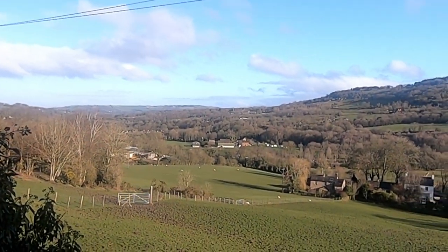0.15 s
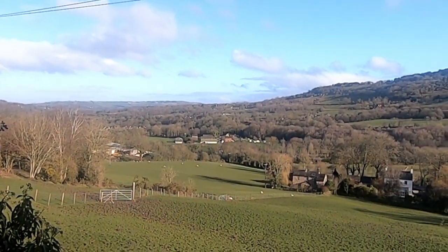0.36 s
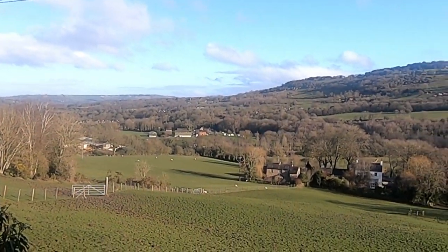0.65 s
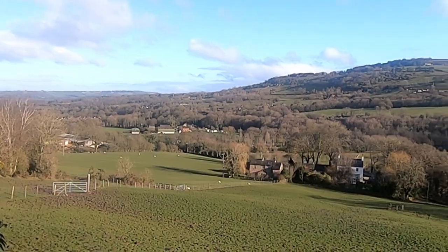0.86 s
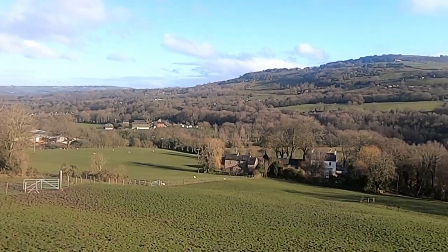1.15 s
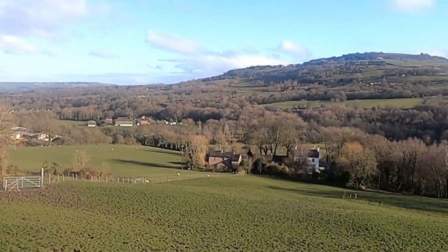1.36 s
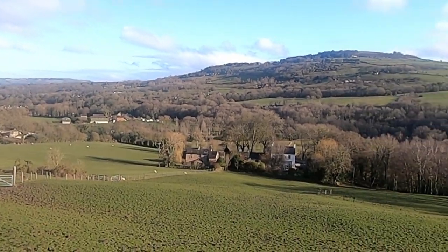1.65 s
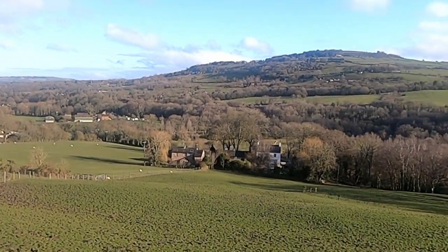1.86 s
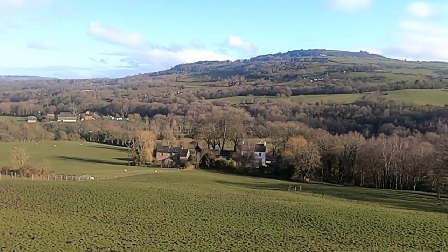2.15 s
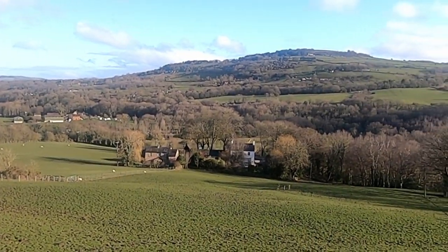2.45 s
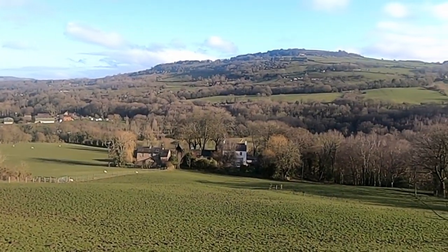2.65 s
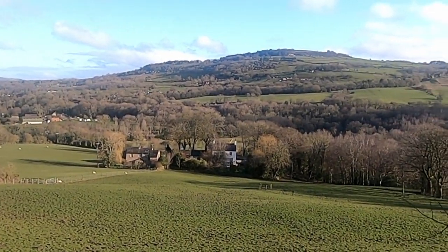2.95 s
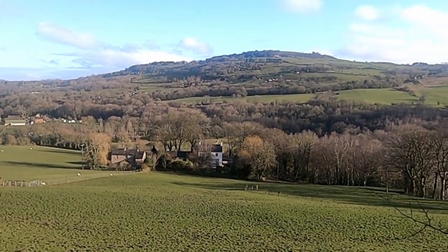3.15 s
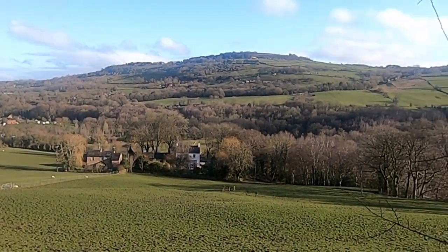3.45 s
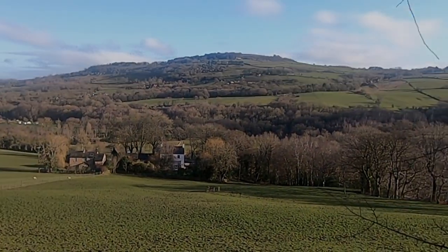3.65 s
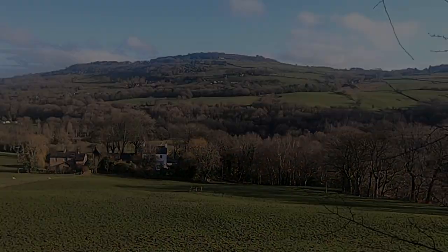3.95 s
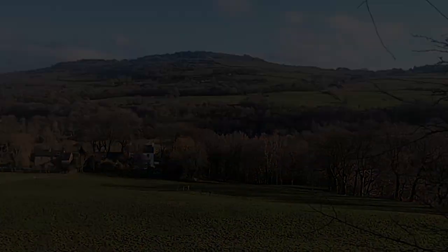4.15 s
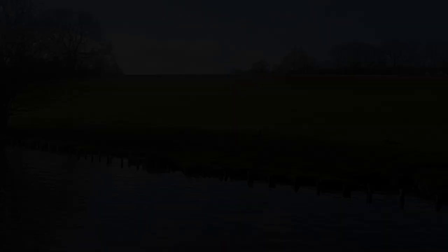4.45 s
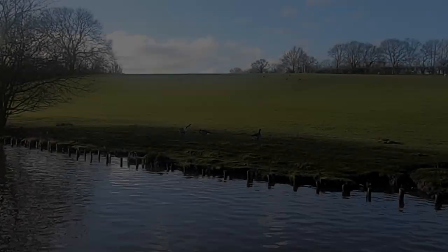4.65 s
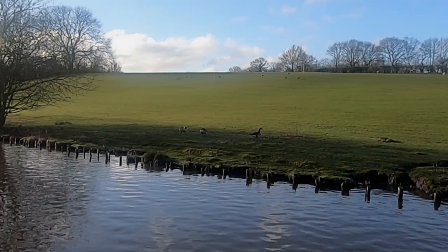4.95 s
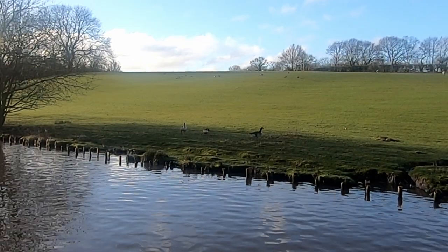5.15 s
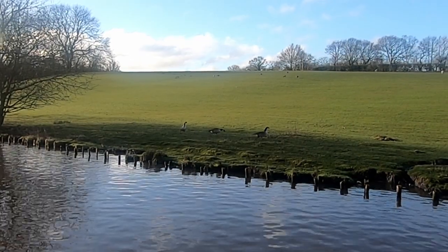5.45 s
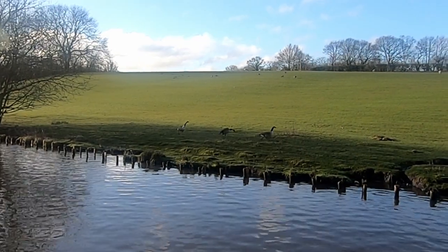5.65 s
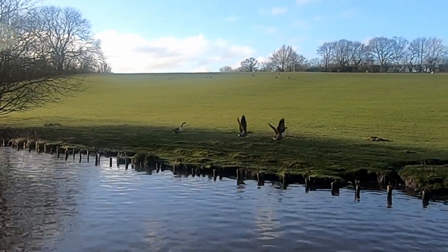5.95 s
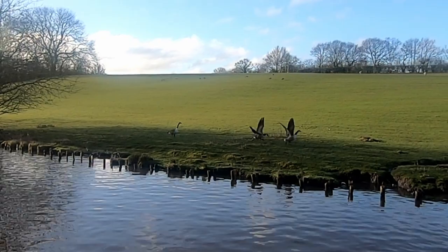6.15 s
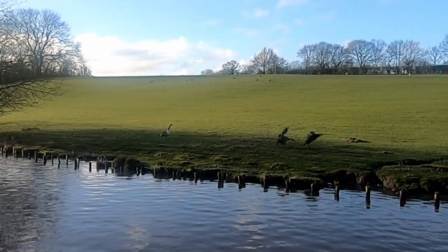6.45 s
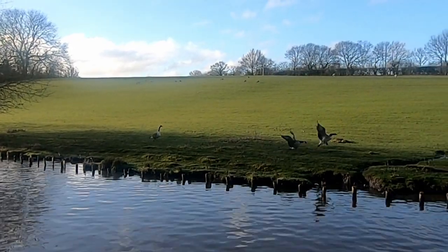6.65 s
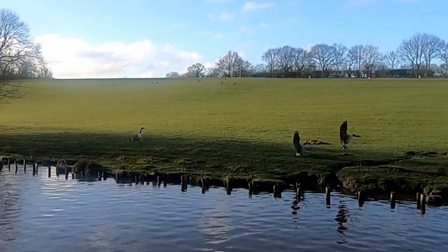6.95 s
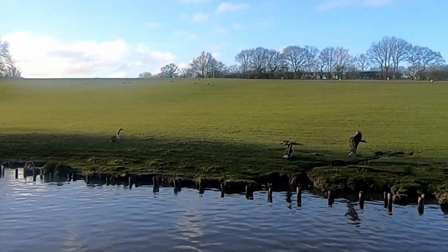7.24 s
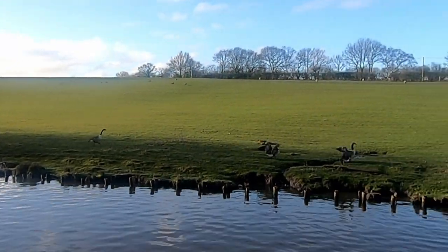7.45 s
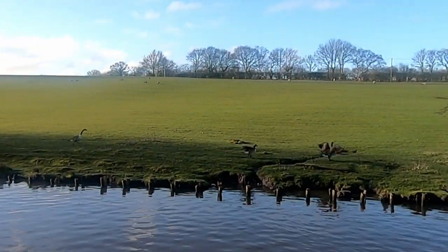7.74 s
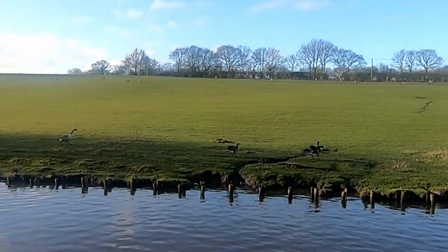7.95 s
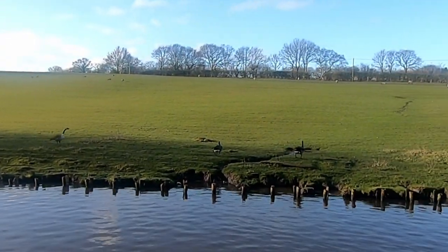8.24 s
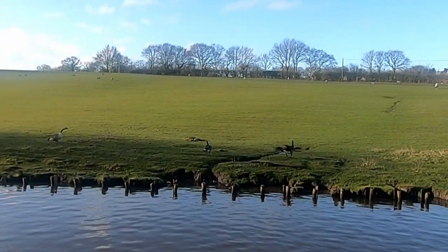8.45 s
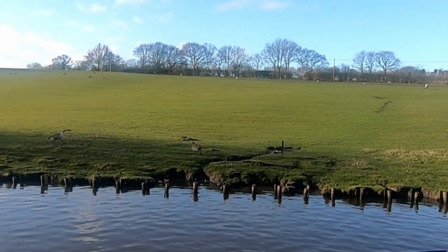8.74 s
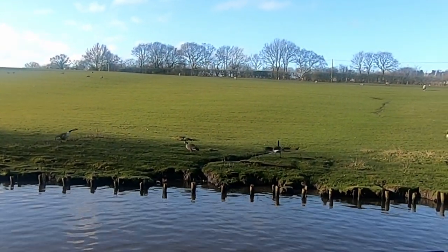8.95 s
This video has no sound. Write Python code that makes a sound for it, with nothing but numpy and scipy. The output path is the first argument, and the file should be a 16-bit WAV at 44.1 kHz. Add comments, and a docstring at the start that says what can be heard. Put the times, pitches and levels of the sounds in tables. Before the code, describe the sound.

Low wind, soft knocks and scattered distant honks fade away; a steady diesel throb and water wash follow, with geese calling loudly near the end.

```python
"""Geese honk over an open field in wind and rustle, with a distant drone, small birds and a few small knocks.
The field fades to nothing and a canal fades in, aboard a boat whose diesel chugs as water washes the hull.
More geese call: drawn notes and honks, a long call winding up, then a rattle, a yodel and a last honk.
Goose voices are buzzing membranes through throat and beak resonances; the engine is a stack of exhaust
tones with throbbing clatter; air and water are coloured noise; knocks are damped rings with cracks."""
import sys
import numpy as np
from scipy import signal
from scipy.fft import rfft, irfft, next_fast_len
from scipy.io import wavfile
from scipy.ndimage import map_coordinates

SR = 44100
rng = np.random.default_rng(int(sys.argv[2]) if len(sys.argv) > 2 else 0)


def int16_out(signal):
    """Quantize to a 16-bit WAV file."""
    q = np.round(np.clip(np.atleast_2d(signal).T, -1, 1) * 32767)
    wavfile.write(sys.argv[1], SR, q.astype(np.int16))


N = 400869
TIME = np.arange(N) / SR

# Honks: goose, start_s, length_s, pitch_hz, sag (share of pitch), hoarse_s, throat_hz,
# level_db and treble_db (both before trims), catch_s (rough catch ahead of the start)
HONK_NOTES = [("far", 1.12, .095, 664, .045, .015, 1270, -35.5, -18, .08),
              ("near", 2.295, .065, 618, 0.019, .03, 1100, -47.5, -23, 0.044),
              ("near", 2.44, 0.046, 738, .05, .015, 1450, -48.5, -11, 0.014),
              ("near", 2.645, 0.155, 628, -0.031, 0.016, 1450, -44, -5.5, 0.016),
              ("near", 2.897, .042, 785, 0.056, .02, 1520, -41, -7.5, .02),
              ("near", 3.075, 0.057, 650, .02, .02, 1330, -44, -6.5, .025),
              ("near", 3.122, .036, 780, .04, 0.018, 1520, -42.5, -3, 0.014),
              ("near", 3.39, 0.031, 778, .04, .015, 1300, -42.5, -5, .03),
              ("near", 3.632, 0.047, 616, 0.0091, 0.019, 1100, -43, -6.5, .04),
              ("near", 3.858, .042, 616, 0, 0.021, 1230, -43, -7, .018),
              ("near", 4.005, 0.094, 645, .01, 0.0085, 1290, -41, -8, .012),
              ("near", 4.128, 0.044, 606, 0, .02, 1240, -43.5, -5, 0.017),
              ("near", 4.355, 0.047, 560, 0.024, 0.035, 1260, -47.5, -5, .015),
              ("takeoff", 6.962, .11, 667, 0.018, .012, 1345, -21, -10, .012),
              ("landing", 9.01, .058, 664, 0.015, 0.027, 1390, -30, -7.5, 0.041)]
# Drawn notes: goose, start_s, length_s, mid_pitch_hz, rise (share of pitch), throat_hz,
# level_db and treble_db (both before trims), rasp (0-1)
DRAWN_NOTES = [("far", .69, .14, 600, -.03, 1200, -49.5, -38, .12),
               ("far", .79, .33, 473, .16, 800, -44, -36.5, .064),
               ("far", 4.87, .13, 424, .12, 880, -52.5, -24, .25),
               ("far", 4.985, .14, 446, -.02, 900, -44.5, -24, .2),
               ("near", 2.305, 0.059, 532, -.03, 1060, -45.5, -20, .15),
               ("near", 2.628, 0.033, 535, -.08, 1070, -46.5, -22, .3),
               ("near", 2.665, 0.063, 718, -.05, 1440, -49, -15, .15),
               ("near", 3.025, .065, 463, .2, 850, -48.5, -23, 0.33),
               ("near", 3.51, .095, 478, .2, 1000, -46, -13.5, 0.55),
               ("near", 4.1, 0.024, 620, .03, 1240, -41, -10.5, .5),
               ("takeoff", 6.545, .035, 628, .11, 1100, -32, -18.5, 0.45),
               ("landing", 8.254, .028, 622, .13, 1250, -36.5, -27, .2),
               ("landing", 8.283, 0.033, 438, -.02, 1080, -41.5, -15, .4),
               ("landing", 8.31, 0.029, 412, -.07, 1230, -36.5, -25, .2),
               ("landing", 8.41, 0.055, 480, 0.055, 1430, -46.5, -29, .45),
               ("landing", 8.66, .07, 490, -0.054, 1450, -35.5, -34, 0.62),
               ("landing", 8.735, 0.035, 463, -0.055, 1380, -34.5, -20, .12)]
# Long calls that change voice: time_s, pitch_hz, level_db, treble_db (before trim), rasp (0-1), split (0-1)
WIND_UP_CURVE = [(6.578, 450, -34.5, -20, 0.25, 0), (6.618, 448, -33, -16, 0.2, 0),
                 (6.64, 465.7, -32, -9, 0.1, 0.2), (6.72, 479, -29.5, -10, .06, 0.22),
                 (6.8, 486.7, -28.5, -11, .06, 0.08), (6.825, 488, -30, -12, .08, 0.4),
                 (6.875, 496, -28.5, -12, .08, 0.3), (6.9, 501, -27.5, -13, .06, 0.07),
                 (6.94, 507, -29, -11, .06, 0), (6.965, 523, -28.5, -8, 0.36, 0.03)]
RATTLE_CURVE = [(8.455, 597, -37, -13, 0.067, 0), (8.495, 607, -34, -14, .05, 0.26),
                (8.525, 613, -35, -12, 0.067, 0.87), (8.62, 623, -32.5, -8.5, 0.065, 0.94),
                (8.65, 631, -33.5, -11.5, .05, 0.0013), (8.7, 631, -33, -10.5, .05, 0),
                (8.76, 614, -40, -10, .1, 0.056)]
YODEL_CURVE = [(8.74, 583, -32, -8, .3, .7), (8.765, 556, -32.5, -10, .15, 0.5),
               (8.798, 520, -33.5, -18, 0.066, 0), (8.825, 547, -32, -13.5, .06, 0),
               (8.86, 569, -30, -10.5, 0.055, 0), (8.88, 557, -33, -12, .2, 0.37),
               (8.895, 528, -38, -14, .25, 0.1)]
# Upper resonances of windpipe and beak: frequency_hz, relative gain_db
FAR_RESONANCES = [(2000, -15.5), (2600, -3.5), (3300, 2.5), (4000, -0.5), (4600, -7), (5400, -22.5),
                  (6500, -29), (7200, -20), (9500, -39.5)]
NEAR_RESONANCES = [(2000, -15.5), (2550, -4.5), (3200, -9), (3850, -2.5), (4500, -0.5), (5200, -2),
                   (7000, 0), (7800, -8), (8500, -13.5), (11000, -49)]
TAKEOFF_RESONANCES = [(2350, -30), (2650, -14.5), (3300, 5), (3950, 0), (4600, -1.5), (5300, -9.5),
                      (5900, -23), (6600, -19.5), (7300, -29.5), (8500, -36), (9300, -42.5), (12000, -49)]
LANDING_RESONANCES = [(2300, -27.5), (2850, -5), (3400, 1.5), (4000, -5), (4600, -1), (5200, -11),
                      (6000, -9), (6700, -13), (7400, -17), (8200, -32), (9500, -27.5), (11000, -52)]
WIND_UP_RESONANCES = [(2350, -41), (2900, -9), (3400, 2), (3850, 2), (4350, -16.5), (4800, -8.5),
                      (5300, -10.5), (5800, -26.5), (6700, -28.5), (8000, -42), (9300, -46)]
RATTLE_RESONANCES = [(2300, -18), (2850, -0.5), (3400, 2), (4000, -2.5), (4500, -1.5), (5100, -5.5),
                     (5700, -3), (6300, -4), (6900, -11.5), (7600, -19), (8300, -32), (8900, -27),
                     (11000, -48)]
YODEL_RESONANCES = [(2300, -36), (2850, -5), (3400, 0), (4000, -5), (4600, -4), (5100, -16), (5700, -21),
                    (6200, -17), (6800, -10.5), (7400, -18), (8200, -34), (9500, -29), (11000, -50)]
# Echoes from banks and trees: delay_s, level_db (before trim)
ECHO_TAPS = [(.021, -25), (0.046, -22.5), (.083, -29.5)]
# Boat engine: time_s, exhaust level_db (before trim)
ENGINE_CURVE = [(4.56, -51), (4.63, -34.5), (4.77, -38), (5.15, -30), (5.23, -22), (6.21, -18), (9.05, -21),
                (9.09, -22)]
# Exhaust tones: multiple of the firing rate, relative level_db
EXHAUST_TONES = [(1, -6), (2, 1.5), (3, 2), (4, -15.5), (5, -14), (6, -26), (7, -26.5), (8, -29.5),
                 (9, -29.5), (10, -38), (11, -41), (12, -31)]
# Around the boat: time_s, clatter_db, wash_db (before trim)
BOAT_CURVE = [(4.6, -47.5, -53.5), (5.15, -42, -51.5), (5.3, -33.5, -49), (6.0, -34, -46),
              (7.3, -34.5, -46.5), (8.1, -40, -51.5), (8.5, -39, -48.5), (9.09, -39.5, -43.5)]
# Breeze aboard: time_s, level_db
BREEZE_CURVE = [(7.4, -54), (8.42, -49), (8.48, -40), (9.09, -45)]
# Small knocks and bumps: start_s, level_db, ring_hz, crack_db (relative to the ring), top_hz of the knock
KNOCK_HITS = [(1.128, -28, 310, -1, 3970), (1.293, -24.5, 204, -16, 3000), (1.454, -33.5, 1310, -6, 3200),
              (1.499, -35, 910, -6, 2800), (1.541, -35.5, 700, -3.5, 2500), (1.710, -25.5, 507, -29, 3000),
              (1.793, -30, 1150, -7.5, 4000), (1.837, -32.5, 990, -8, 3500), (2.089, -35.5, 700, -10, 2500),
              (2.862, -26.5, 201, -26, 2500), (3.242, -38, 1210, -9, 3000), (3.437, -33, 1010, -16, 3000),
              (6.559, -32, 1307, 4, 13000)]
# Small birds far off: start_s, length_s, from_hz, to_hz, level_db
CHIRP_NOTES = [(0.73, 0.041, 3400, 4600, -76), (0.872, 0.065, 3900, 4560, -77),
               (3.165, .055, 3200, 3550, -67), (3.23, 0.11, 3950, 3900, -73),
               (4.274, 0.049, 3800, 3300, -75), (4.847, 0.085, 3000, 3870, -69)]
# Over the field: time_s, rustle_db, drone_db
FIELD_CURVE = [(0, -47, -39.5), (1.3, -44.5, -39), (2.05, -45.5, -38), (2.2, -46.5, -32.5), (2.9, -49, -36),
               (3.45, -50, -39)]
# Noise colours: frequency_hz, relative gain_db
WIND_COLOUR = [(18, 6), (45, 7), (75, 6.5), (120, -2), (180, -5), (250, -18.5), (400, -37.5)]
RUSTLE_COLOUR = [(220, 3.5), (480, -3), (700, -6.5), (1100, -7), (1800, -16), (2600, -20.5), (3800, -25.5),
                 (4700, -34.5), (5600, -54), (8000, -47), (10400, -73)]
HISS_COLOUR = [(3500, -5), (4500, 0), (6000, -6), (8000, -4.5), (9500, -20.5)]
CLATTER_COLOUR = [(110, -1.5), (155, 1), (205, -13.5), (280, -14.5), (355, -17), (430, -23.5), (600, -29)]
WASH_COLOUR = [(330, -12), (500, -3), (700, -7), (1070, -4), (1600, -7.5), (2600, -11.5), (3500, -16.5),
               (4600, -26), (5500, -37), (8000, -36.5), (10400, -61)]
CRACK_COLOUR = [(400, -3.5), (1200, 1), (3000, -4), (4500, -13), (6000, -25), (10000, -33.5), (13000, -53)]

# goose voice
TOP_HARMONIC_HZ = 12500
HOLLOW_HZ = 2080  # the throat's response drops away above here
HOARSE_WIDENS = 1.6  # rasp blurs the throat resonance
SPLIT_SWING = 0.3  # radians by which a split voice pulls its cycles out of step
# the catch: pitch and rise as shares of the honk's pitch, rasp 0-1
CATCH_PITCH, CATCH_RISE, CATCH_RASP, CATCH_OVERLAP_S = 0.91, 0.08, 0.65, 0.016
CATCH_SWELL_DB, HONK_SWELL_DB = 3, -3  # from the middle of a note to its end
HONK_SCOOP, SCOOP_S = 0.015, 0.008  # scoop up to pitch, as a share of pitch
HONK_RASP, HONK_SPLIT = 0.55, 0.7  # extra rasp and split in the hoarse start
GLIDE_EVEN = 0.6  # steady share of a drawn glide; the rest comes at the ends
GLIDE_ARCH = 0.01  # droop of both ends, as a share of pitch
SWELL_DB_PER_RISE = 22.5  # loudness and pitch rise together
WIND_UP_THROAT_HZ, RATTLE_THROAT_HZ, YODEL_THROAT_HZ = 1114, 1176, 1536

# canal: fades in, and later spreads from the centre to both ears
FIRING_HZ, FIRING_WANDER_HZ = 28.96, 0.08
CANAL_S, ENGINE_IN_S, WASH_IN_S = 4.509, 0.099, 0.42
CANAL_WIDENS_S, CANAL_WIDE_S = 7.25, 7.58

CHIRP_ARCH_HZ = 200  # each chirp bows upward in its middle

# field: spreads from the centre, then fades out
WIND_DB = -36.5
GUST_S, GUST_LENGTH_S, GUST_DB = 4.13, 0.18, 4  # one late gust
WIDENS_S, WIDE_S, WIDE_DB = 1.82, 3.56, -8
HISS_DB, HISS_IN_S, HISS_FULL_S = -74, 1.6, 2.7
FADE_OUT_S, SILENT_S, FADE_POWER = 3.43, 4.483, 1.22


def from_db(db):
    """Decibels to gain."""
    return 10 ** (np.asarray(db) / 20)


def rms_one(x):
    """Scale to unit rms."""
    return x / np.sqrt(np.mean(x ** 2) + 1e-20)


def in_time(rows):
    """Draw each column of a curve table at every sample."""
    s, *columns = np.transpose(rows)
    return [np.interp(TIME, s, c) for c in columns]


def ramp(from_s, to_s):
    """0 at the first time, 1 at the second, straight between."""
    return np.clip((TIME - from_s) / (to_s - from_s), 0, 1)


def progress(length_s):
    """From 0 to 1 over a note."""
    return np.linspace(0, 1, int(length_s * SR))


def sine(pitch_hz):
    """A sine that follows a moving pitch."""
    return np.sin(2 * np.pi * np.cumsum(pitch_hz) / SR)


def low_pass(x, top_hz):
    """A gentle second-order treble cut."""
    return signal.sosfilt(signal.butter(2, min(top_hz, SR / 3), fs=SR, output="sos"), x)


def coloured(x, points):
    """Filter x by a drawn response, falling 36 dB per octave beyond its ends; unit rms."""
    size = next_fast_len(len(x))
    hz, db = np.transpose(points)
    f = np.maximum(np.fft.rfftfreq(size, 1 / SR), 1)
    octaves_outside = np.maximum(np.log2(hz[0] / f), 0) + np.maximum(np.log2(f / hz[-1]), 0)
    gain = from_db(np.interp(np.log(f), np.log(hz), db) - 36 * octaves_outside)
    return rms_one(irfft(rfft(x, size) * gain, size)[:len(x)])


def drift(rate, size=N):
    """Smooth random wander with about `rate` new values a second."""
    knots = rng.standard_normal(int(size / SR * rate) + 4)
    coarse = np.arange(0, size, 16)
    wander = map_coordinates(knots, [1 + coarse / SR * rate], order=2, mode="nearest")
    return np.interp(np.arange(size), coarse, wander)


def noise(points, flicker_db, rate):
    """Coloured noise with a restless level."""
    return coloured(rng.standard_normal(N), points) * from_db(flicker_db * drift(rate))


def add(track, start, sound):
    """Mix a sound into the track at a time."""
    at = int(start * SR)
    track[at:at + len(sound)] += sound[:N - at]


def place(x, pan_db, lag_ms):
    """Pan by level (positive is left) and by a delay of the left side."""
    left = np.interp(TIME - lag_ms / 1000, TIME, x) * from_db(pan_db / 2)
    return np.array([left, x * from_db(-pan_db / 2)])


def syrinx(pitch, rasp, split, tremor, uneven_db, order, jitter=0.054):
    """Buzzing membranes: rasp roughens cycles and adds puffs of noise; a split pulses every `order` cycles."""
    size = len(pitch)
    wobble = 1 + tremor * drift(70, size) + jitter * rasp * drift(400, size)
    phase = 2 * np.pi * np.cumsum(pitch * wobble) / SR
    swung = phase - SPLIT_SWING * split * np.sin(phase / order)
    buzz = np.zeros(size)
    for k in range(1, int(TOP_HARMONIC_HZ / pitch.max())):
        # each harmonic wavers in strength, the higher ones more
        waver = from_db(uneven_db * min(k / 10, 1) * drift(25, size))
        buzz += waver * np.cos(k * swung)
    puffs = 1.9 * rasp * rng.standard_normal(size) * (1 + np.cos(phase)) / 2
    gate = (1 + split * np.cos(phase / order)) / np.sqrt(1 + split ** 2 / 2)
    return (rms_one(buzz) + puffs) * gate


def geese(notes, beak, width_hz, fundamental_db, attack_s, release_s, treble_db, flutter_db, bloom, order,
          tremor=0.0015, uneven_db=3):
    """The buzz rings a throat resonance beside the fundamental, and the upper windpipe and beak resonances."""
    out = np.zeros(N)
    for start, throat_hz, *controls in notes:
        # hold the last values for half the release
        hold = (0, int(release_s / 2 * SR))
        held = (np.pad(c, hold, "edge") for c in np.broadcast_arrays(*controls))
        pitch, level_db, bright_db, rasp, split = held
        t = TIME[:len(pitch)]
        source = syrinx(pitch, np.clip(rasp, 0, 1), np.clip(split, 0, 1), tremor, uneven_db, order)
        hz = np.geomspace(380, 2900, 50)
        width = width_hz * (1 + HOARSE_WIDENS * np.mean(rasp ** 2))
        resonance = 1 / np.hypot(1, (hz ** 2 - throat_hz ** 2) / (2 * hz * width))
        fundamental = from_db(fundamental_db) / (1 + ((hz - pitch.mean()) / 60) ** 2)
        # a hollow lies between the throat and the beak resonances
        response = (resonance + fundamental) / (1 + (hz / HOLLOW_HZ) ** 20)
        throat = coloured(source, np.c_[hz, 20 * np.log10(response)])
        treble = coloured(source, beak) * from_db(bright_db + treble_db + flutter_db * drift(49, len(t)))
        attack = np.sin(np.pi / 2 * np.clip(t / attack_s, 0, 1))
        release = np.sin(np.pi / 2 * np.clip((t[-1] - t) / release_s, 0, 1)) ** 2
        # the upper harmonics need more push: they bloom in the middle of the note
        push = (np.sin(np.pi * t / t[-1]) ** 2 + 0.001) ** bloom
        add(out, start, from_db(level_db) * attack * release * (throat + push * treble))
    return out


def honks(goose, catch_db, catch_treble_db, drop, rasp):
    """A rough rising catch breaks upward into a note that starts hoarse, clears, sags or lifts, then drops."""
    notes = []
    for who, start, length, hz, sag, hoarse_s, throat_hz, level_db, bright_db, catch_s in HONK_NOTES:
        if who != goose:
            continue
        x = 2 * progress(catch_s + CATCH_OVERLAP_S) - 1
        rising = hz * (CATCH_PITCH + CATCH_RISE * x / 2)
        catch_level = level_db + catch_db + CATCH_SWELL_DB * x
        notes.append((start - catch_s, CATCH_PITCH * throat_hz, rising, catch_level,
                      bright_db + catch_treble_db, CATCH_RASP, 0))
        along = progress(length)
        scoop = HONK_SCOOP * np.exp(-along * length / SCOOP_S)
        pitch = hz * (1 - scoop - sag * along - drop * along ** 6)
        hoarse = np.exp(-(along * length / hoarse_s) ** 4)
        honk_level = level_db + HONK_SWELL_DB * (2 * along - 1)
        notes.append((start, throat_hz, pitch, honk_level, bright_db,
                      rasp + HONK_RASP * hoarse, HONK_SPLIT * hoarse))
    return notes


def drawn(goose):
    """A drawn note glides fastest at its ends; its loudness follows its rise or fall."""
    notes = []
    for who, start, length, hz, rise, throat_hz, level_db, bright_db, rasp in DRAWN_NOTES:
        if who != goose:
            continue
        x = 2 * progress(length) - 1
        glide = GLIDE_EVEN * x + (1 - GLIDE_EVEN) * x ** 3
        pitch = hz * (1 + rise * glide / 2 - GLIDE_ARCH * x ** 2)
        swell_db = SWELL_DB_PER_RISE * rise * x
        notes.append((start, throat_hz, pitch, level_db + swell_db, bright_db, rasp, 0))
    return notes


def long_call(rows, throat_hz):
    """One unbroken note whose pitch, effort and voice follow a curve."""
    start, end = rows[0][0], rows[-1][0]
    span = slice(int(start * SR), int(end * SR))
    return [(start, throat_hz, *(c[span] for c in in_time(rows)))]


def outdoors(x, tail_db, t60_s, echo_db, dull_hz):
    """A few dull echoes and a thin scattered tail, without the direct sound."""
    dull = low_pass(x + 1e-18, dull_hz)
    t = TIME[:SR]
    scatter = rng.standard_normal(SR) * from_db(-60 * t / t60_s) * (t > 0.008)
    response = scatter / np.linalg.norm(scatter) * from_db(tail_db)
    for delay_s, db in ECHO_TAPS:
        response[int(delay_s * SR)] += from_db(db + echo_db)
    return signal.fftconvolve(dull, response)[:N]


def boat(lag_turns=0.15, uneven_db=0.5, throb=0.38, width_db=-7, exhaust_db=-0.07):
    """Every firing drives exhaust tones and a burst of clatter; water washes the hull and a breeze gets up."""
    engine_db, = in_time(ENGINE_CURVE)
    clatter_db, wash_db = in_time(BOAT_CURVE)
    breeze_db, = in_time(BREEZE_CURVE)
    phase = 2 * np.pi * np.cumsum(FIRING_HZ + FIRING_WANDER_HZ * drift(3)) / SR
    tones = np.zeros(N)
    for k, db in EXHAUST_TONES:
        # the silencer delays higher tones more, which smears each pulse
        lag = 2 * np.pi * lag_turns * k * k
        tones += from_db(db + uneven_db * k / 3 * drift(18)) * np.cos(k * phase - lag)
    clatter = from_db(clatter_db) * noise(CLATTER_COLOUR, flicker_db=0.5, rate=22) * (1 + throb * np.cos(phase))
    engine = from_db(engine_db + exhaust_db) * rms_one(tones) + clatter
    mid, side = (noise(WASH_COLOUR, flicker_db=1.5, rate=20) for _ in range(2))
    breeze = from_db(breeze_db) * noise(WIND_COLOUR, flicker_db=1.5, rate=14)
    # opposite sign in each ear gives width
    spread = ramp(CANAL_WIDENS_S, CANAL_WIDE_S) * np.array([[1], [-1]])
    water = from_db(wash_db - 1.5) * (mid + from_db(width_db) * side * spread) + breeze * spread
    return ramp(CANAL_S, CANAL_S + ENGINE_IN_S) * engine + ramp(CANAL_S, CANAL_S + WASH_IN_S) * water


def knocks(ring_cycles=2.17, crack_s=0.0048):
    """Each knock is a short crack and a quickly damped ring; soft contacts sound duller."""
    out, t = np.zeros(N), TIME[:SR // 10]
    for start, level_db, ring_hz, crack_db, top_hz in KNOCK_HITS:
        ring = np.sin(2 * np.pi * ring_hz * t) * np.exp(-t * ring_hz / ring_cycles)
        crack = coloured(rng.standard_normal(len(t)), CRACK_COLOUR) * np.exp(-t / crack_s)
        add(out, start, from_db(level_db) * low_pass(ring + from_db(crack_db) * crack, top_hz))
    return out


def birds():
    """Thin whistled sweeps, each a gliding sine under a smooth swell."""
    out = np.zeros(N)
    for start, length, from_hz, to_hz, level_db in CHIRP_NOTES:
        along = progress(length)
        pitch = from_hz + (to_hz - from_hz) * along + CHIRP_ARCH_HZ * np.sin(np.pi * along)
        add(out, start, from_db(level_db) * rms_one(np.hanning(len(pitch)) * sine(pitch)))
    return out


def field(drone_hz=104.6, waver_hz=1.58, drone_spread_db=-6, wind_spread_db=4):
    """Wind rumble, far rustle, a distant engine's wavering drone and a thin rising hiss."""
    rustle_db, drone_db = in_time(FIELD_CURVE)
    wind_db = WIND_DB + GUST_DB * np.exp(-((TIME - GUST_S) / GUST_LENGTH_S) ** 2)
    # two independent layers of each: one for the centre, one for the width
    wind = [from_db(wind_db) * noise(WIND_COLOUR, flicker_db=2.5, rate=14) for _ in range(2)]
    rustle = [from_db(rustle_db) * noise(RUSTLE_COLOUR, flicker_db=0.6, rate=25) for _ in range(2)]
    drone = [from_db(drone_db + 2.0 * drift(13)) * rms_one(sine(drone_hz + waver_hz * drift(12)))
             for _ in range(2)]
    mid = wind[0] + rustle[0] + drone[0]
    side = from_db(wind_spread_db) * wind[1] + rustle[1] + from_db(drone_spread_db) * drone[1]
    width = from_db(WIDE_DB) * ramp(WIDENS_S, WIDE_S)
    hiss = from_db(HISS_DB) * ramp(HISS_IN_S, HISS_FULL_S) * noise(HISS_COLOUR, flicker_db=-0.5, rate=12)
    return mid + width * side * np.array([[1], [-1]]) + place(hiss, pan_db=-7, lag_ms=0.06)


def scene():
    """The field and near geese fade out before the canal fades in; far geese, birds and knocks do not fade."""
    far_notes = drawn("far") + honks("far", catch_db=-3.5, catch_treble_db=-1, drop=0.035, rasp=0.08)
    far = geese(far_notes, FAR_RESONANCES, width_hz=47, fundamental_db=-8, attack_s=0.015, release_s=0.027,
                treble_db=0.5, flutter_db=2.5, bloom=0.42, order=4)
    near_notes = drawn("near") + honks("near", catch_db=-3, catch_treble_db=-4, drop=0.006, rasp=0.15)
    near = geese(near_notes, NEAR_RESONANCES, width_hz=96, fundamental_db=-12.5, attack_s=0.025,
                 release_s=0.033, treble_db=1.5, flutter_db=3.0, bloom=0.34, order=4, tremor=0.011)
    wind_up = geese(long_call(WIND_UP_CURVE, WIND_UP_THROAT_HZ), WIND_UP_RESONANCES, width_hz=94,
                    fundamental_db=-19.5, attack_s=0.016, release_s=0.045,
                    treble_db=1.5, flutter_db=2.0, bloom=0.3, order=6)
    takeoff_notes = drawn("takeoff") + honks("takeoff", catch_db=-7.5, catch_treble_db=2, drop=0.028, rasp=0.03)
    takeoff = wind_up + geese(takeoff_notes, TAKEOFF_RESONANCES, width_hz=89, fundamental_db=-35,
                              attack_s=0.022, release_s=0.03, treble_db=1.5, flutter_db=1.8, bloom=0.45, order=2)
    landing_notes = drawn("landing") + honks("landing", catch_db=-8, catch_treble_db=-1, drop=0.03, rasp=0.06)
    landing = geese(landing_notes, LANDING_RESONANCES, width_hz=100, fundamental_db=-20.5, attack_s=0.0088,
                    release_s=0.018, treble_db=2.5, flutter_db=2.5, bloom=0.26, order=2)
    rattler = geese(long_call(RATTLE_CURVE, RATTLE_THROAT_HZ), RATTLE_RESONANCES, width_hz=82,
                    fundamental_db=-36, attack_s=0.012, release_s=0.032,
                    treble_db=1.0, flutter_db=1.5, bloom=0.24, order=4, tremor=0.0025)
    yodeller = geese(long_call(YODEL_CURVE, YODEL_THROAT_HZ), YODEL_RESONANCES, width_hz=76,
                     fundamental_db=-8, attack_s=0.012, release_s=0.02,
                     treble_db=1.5, flutter_db=1.0, bloom=0.3, order=2)

    far = far + outdoors(far, tail_db=-9.5, t60_s=0.37, echo_db=4.5, dull_hz=4500)
    # the near geese stand to the right; each ear gets its own reflections
    near_echo = np.array([from_db(pan_db) * outdoors(near, tail_db=-6.0, t60_s=0.54, echo_db=3, dull_hz=3200)
                          for pan_db in (-2.5, 2.5)])
    hillside = field() + from_db(1.5) * (place(near, pan_db=-10.5, lag_ms=0.061) + near_echo)
    takeoff = takeoff + outdoors(takeoff, tail_db=-24.5, t60_s=0.52, echo_db=0, dull_hz=9000)
    bank = landing + rattler + yodeller
    bank_echo = np.array([outdoors(bank, tail_db=-12.5, t60_s=0.36, echo_db=-3, dull_hz=5000)
                          for _ in range(2)])
    canal = boat() + takeoff + place(bank, pan_db=-1.5, lag_ms=0.024) + bank_echo
    fade_out = ramp(SILENT_S, FADE_OUT_S) ** FADE_POWER
    return fade_out * hillside + canal + far + birds() + knocks()


def record(dry):
    """Cut the top steeply, 70 dB down from 14 kHz."""
    return signal.sosfilt(signal.cheby2(12, 70, 14000, fs=SR, output="sos"), dry)


dry = scene()
out = record(dry)
int16_out(out)
```